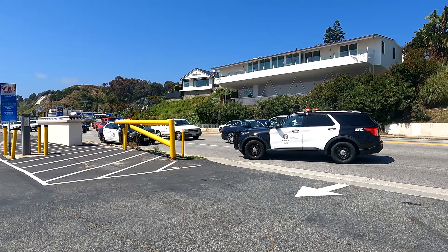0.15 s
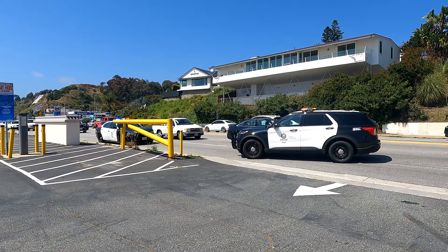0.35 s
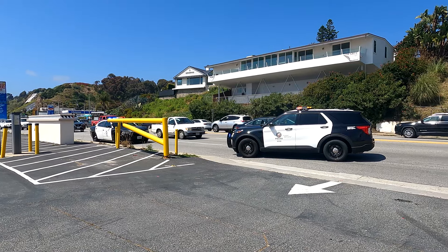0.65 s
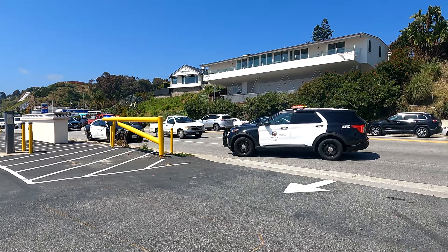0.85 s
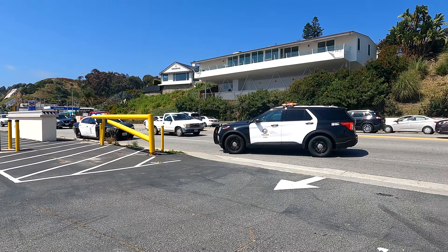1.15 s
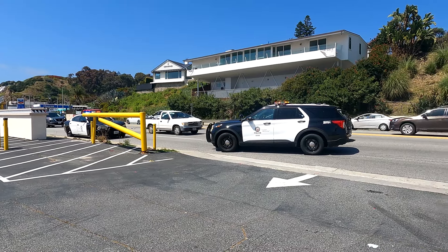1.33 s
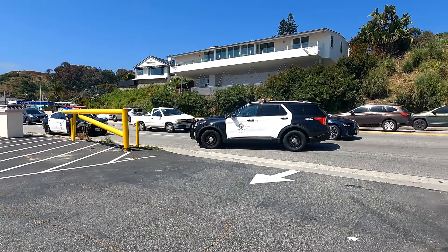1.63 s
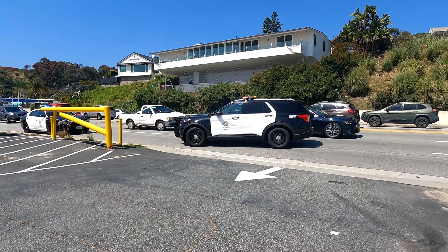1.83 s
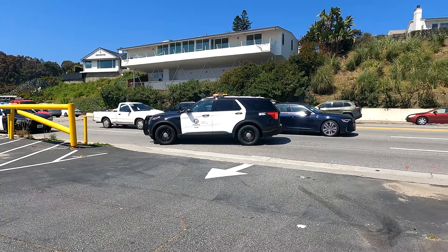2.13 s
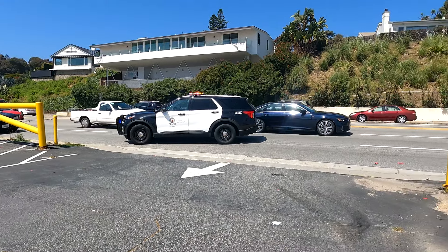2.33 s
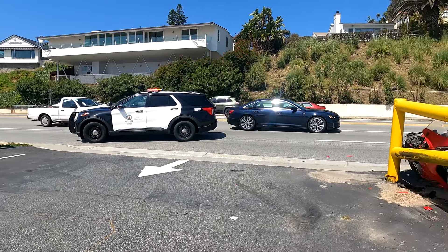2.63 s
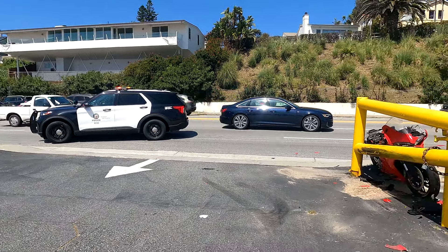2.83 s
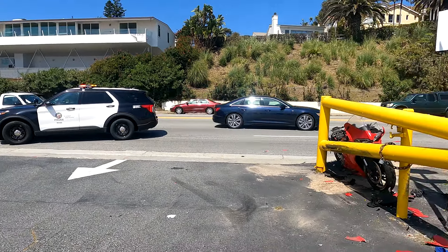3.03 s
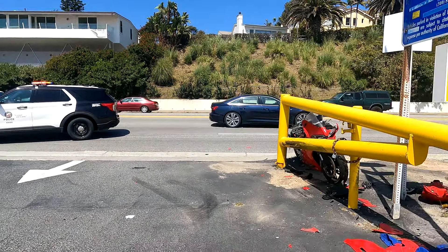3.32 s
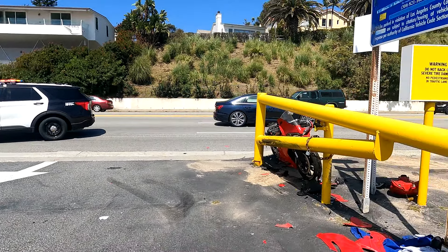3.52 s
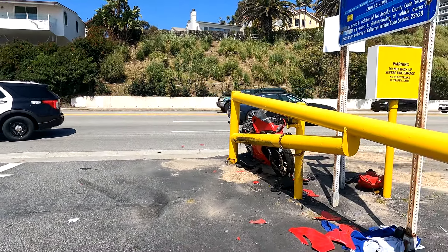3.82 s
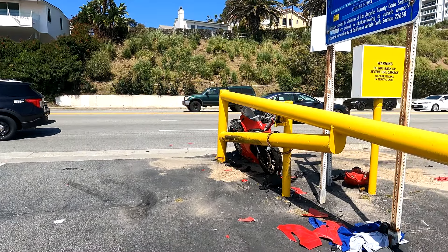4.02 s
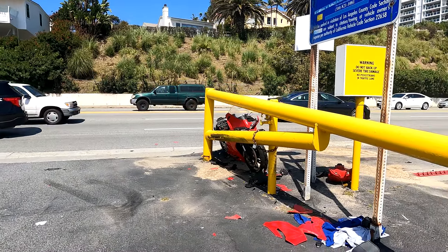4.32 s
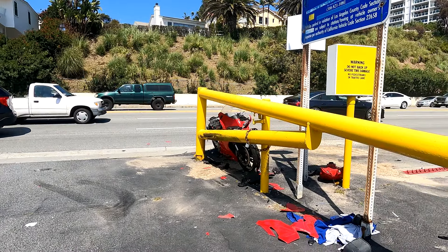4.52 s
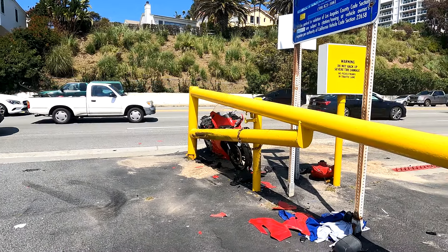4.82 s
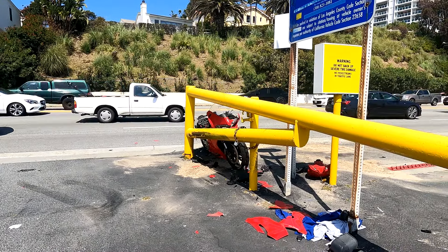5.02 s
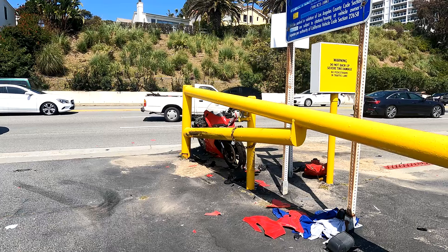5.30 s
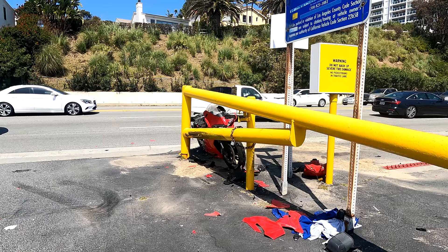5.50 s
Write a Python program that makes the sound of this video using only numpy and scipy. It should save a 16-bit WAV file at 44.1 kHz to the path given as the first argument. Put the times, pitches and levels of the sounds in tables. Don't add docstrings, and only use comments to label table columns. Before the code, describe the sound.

Outdoors beside a busy road, a small handheld microphone picks up constant traffic rumble and tyre hiss. A loud, low engine pulls away, its pitch rising slowly throughout. Past the middle, a truck engine revs up and nears, bringing clatter, tyre roar and a thin high metal squeal, then its pitch drops as it shifts and loose links clink.

```python
import sys
import numpy as np
from scipy import signal
from scipy.io import wavfile
from scipy.ndimage import uniform_filter1d

SR = 44100
rng = np.random.default_rng(int(sys.argv[2]) if len(sys.argv) > 2 else 0)


def master(y):
    cut = np.clip(np.atleast_2d(y).T, -1, 1)
    pcm = np.round(cut * 32767)
    wavfile.write(sys.argv[1], SR, pcm.astype(np.int16))


def decibels_to_gain(level_db):
    exponent = np.asarray(level_db, float) / 20
    return 10 ** exponent


N = 249503

# time_s, firing_hz, level_db
PULLER_REVS = [(0, 65.7, 2), (.2, 69.64, 0.5), (.6, 72.1, 0), (1.0, 74.38, -1.5), (1.4, 75.76, -2),
               (1.8, 78.3, -2.5), (2.4, 80.5, -3), (3.0, 83.28, -7), (3.6, 86.54, -3.5), (4.2, 89.13, -5),
               (4.8, 91.83, -4.5), (5.66, 97, -7.5)]
# order, level_db
PULLER_ORDERS = [(1, -19), (2, -24.5), (3, -29), (4, -30), (5, -33.5), (6, -39.5), (7, -45), (8, -49),
                 (9, -52), (10, -51.5)]
# centre_hz, half_width_hz, lift_db
EXHAUST_PEAKS = [(72.8, 1.9, 2), (148.9, 5.95, 8.5), (175.2, 14.8, -10), (207.7, 6.8, 8.5),
                 (234.3, 11.6, -14.5), (270, 10, 3), (290, 5.65, 10), (298, 10, -0.5), (366.4, 12, -4),
                 (406, 13.16, 9), (459, 11, -6)]
# centre_hz, half_width_hz, lift_db
INTAKE_PEAKS = [(402, 15, -4), (426, 4.7, 5.5), (440, 7.1, -7.5), (466, 14, 5), (518, 7.7, -4),
                (572.7, 27, 9)]
# freq_hz, density_db_per_hz
RUMBLE_COLOUR = [(8.8, -43.5), (15, -11.5), (59, 1), (80, 0), (118, -4.5), (155, -5.5), (254, -12.5),
                 (312, -16.5), (400, -23.5), (520, -45.5), (880, -120)]
# freq_hz, density_db_per_hz
ROAR_COLOUR = [(88, -29), (150, 1.5), (254, -10), (317, -6.5), (377, -13.5), (425, -9.5), (708, -20),
               (900, -19), (1170, -33), (1980, -120)]
# freq_hz, density_db_per_hz
HISS_COLOUR = [(600, -5.5), (800, -8), (1050, -4.5), (1500, -12), (2000, -18.5), (3000, -22.5), (4500, -29),
               (5700, -34), (6800, -43.5), (8500, -48.5), (10000, -56), (11500, -63.5), (12700, -70.5),
               (12900, -110)]
# closest_s, half_length_s, engine_lift_db, tyre_lift_db
CARS = [
    (0, 0.16, 0.5, 2),
    (0.593, 0.37, 2, 0),
    (2.096, 0.25, 3.5, 0),
    (2.502, 0.54, 1, 2.5),
    (3.098, .25, 2, 0.5),
    (3.902, .35, 3, 0.5),
]
# centre_s, half_length_s, roar_lift_db
LANE_BUNCHES = [
    (0.504, .3, 0.5),
    (2.847, 0.81, -1.5),
    (3.804, 0.2, 4),
    (4.2, 0.22, -3),
    (4.948, .35, 6),
]
# centre_s, level_db, length_s
CRUNCHES = [(.3, -90, .04), (1.04, -85, .012), (2.345, -73, .015), (2.39, -82, .04), (2.47, -79, .02),
            (2.515, -75, .035), (2.59, -80, .02), (4.87, -62, .012), (5.22, -72, .03)]
# time_s, clatter_db
TRUCK_NEARNESS = [(3.2, -47), (4.05, -48.5), (4.3, -44), (4.7, -35.5), (4.9, -35), (5.1, -32.5),
                  (5.18, -35), (5.3, -37), (5.66, -40.5)]
# freq_hz, density_db_per_hz
CLATTER_COLOUR = [(1500, -1.5), (2000, -8), (2800, -11), (3300, -10), (4000, -14), (4600, -15), (5700, -18),
                  (7000, -27.5), (8200, -31), (9500, -32), (10200, -39), (11500, -43), (14500, -45),
                  (15600, -49.5)]
# freq_hz, density_db_per_hz
TRUCK_TYRE_COLOUR = [(350, -17), (450, -5.5), (560, 3), (700, 1.5), (830, -11), (1050, 1.5), (1400, -0.5),
                     (1800, -15), (2500, -13), (3000, -34.5)]
# time_s, cancelled_hz
GROUND_NOTCH = [(3.3, 720), (4.4, 853), (5.66, 840)]
# time_s, firing_hz, level_db
DRONE_REVS = [(3.2, 145.2, -28.5), (3.5, 145.3, -24.5), (4.0, 145.1, -27), (4.27, 141.3, -33),
              (5.0, 140, -43.5), (5.3, 142, -26), (5.66, 140.5, -37)]
# time_s, firing_hz, level_db
TRUCK_REVS = [(3.3, 50.7, -12), (3.7, 62.46, -10.5), (3.88, 68.6, -1), (4.08, 80.34, 2.5), (4.4, 91.9, -2),
              (4.75, 111.1, -1.5), (4.95, 118.7, 1.5), (5.12, 121.1, -0.5), (5.66, 100.4, -4)]
# order, level_db
TRUCK_LOW_ORDERS = [(1, -20), (2, -29.5), (3, -37)]
# order, over_order_3_db
TRUCK_HIGH_ORDERS = [(2.5, 4.5), (4, -4.5), (4.5, -2.5), (5, -2.5), (8.5, -9), (9, -6), (11.5, -13)]
# centre_hz, width_hz, start_s, end_s, level_db
METAL_PARTS = [(3055, 45, 4.75, 5.12, -45), (3125, 45, 4.52, 4.97, -44), (3130, 60, 3.7, 4.5, -61),
               (3100, 90, 5.0, 5.4, -51), (3315, 26, 4.62, 4.82, -45.5), (3290, 80, 4.82, 5.12, -45),
               (3470, 70, 4.8, 5.12, -44), (3505, 21, 4.84, 4.98, -39.5), (3972, 15, 4.63, 4.9, -42),
               (4020, 60, 4.7, 5.1, -51), (4168, 15.5, 4.87, 5.0, -45), (5165, 45, 4.54, 4.95, -51),
               (5410, 45, 4.72, 5.12, -55), (8800, 1100, 4.2, 5.1, -61)]
# time_s, level_db
CHAIN_KNOCKS = [(5.21, -46), (5.235, -46), (5.285, -45), (5.315, -47), (5.415, -46), (5.535, -48)]
# mode_hz, level_db, t60_s
LINK_MODES = [(3150, 2, .1), (4590, 0, .12), (4850, -2, .1), (5165, 0, .11), (5750, -4, .08),
              (6560, -7, .07)]


def bump(x, centre, width):
    return np.exp(-.5 * ((x - centre) / width) ** 2)


def evened(x):
    return x / np.sqrt(np.mean(x ** 2) + 1e-20)


def curves(rows):
    time_s, *columns = np.transpose(rows)
    return [np.interp(np.arange(N) / SR, time_s, c) for c in columns]


def fade_in(start_s, length_s):
    return np.clip((np.arange(N) / SR - start_s) / length_s, 0, 1)


def wander(top_hz):
    f = np.geomspace(top_hz / 20, top_hz, num=16)
    t = np.arange(0, N + 256, 256) / SR
    waves = np.sin(2 * np.pi * (f * t[:, None] + rng.random(len(f))))
    slow = (waves / np.sqrt(f)).sum(axis=1)
    return np.interp(np.arange(N) / SR, t, evened(slow))


def noise(colour, patchy_db, size=1024):
    hop, hz = size // 4, np.fft.rfftfreq(size, 1 / SR)
    a, b, patches = rng.standard_normal((N // hop + 5, len(hz), 3)).T
    patches = uniform_filter1d(patches, size=10, axis=0)
    patches = evened(uniform_filter1d(patches, size=12, axis=1))
    f, db = np.transpose(colour)
    colour_db = np.interp(np.log(hz + 1), np.log(f + 1), db, left=-120, right=-120)
    spectra = (a + 1j * b) * decibels_to_gain(colour_db[:, None] + patchy_db * patches)
    return evened(signal.istft(spectra, nperseg=size, noverlap=size - hop)[1][:N])


def brightened(x, lift_db, edge_hz):
    high = signal.butter(3, edge_hz, "high", fs=SR, output="sos")
    return x + signal.sosfiltfilt(high, x) * (decibels_to_gain(lift_db) - 1)


def resonate(x, centre_hz, width_hz):
    turn = np.exp(2j * np.pi * np.cumsum(centre_hz * np.ones(N)) / SR)
    r = np.exp(-np.pi * width_hz / SR)
    smooth = signal.lfilter([1 - r], [1, -r], x * turn.conj())
    return 2 * (turn * smooth).real


def orders(firing_hz, levels, flutter_db, flutter_hz, slip_rad, lag_turns):
    turns = np.cumsum(firing_hz) / SR - lag_turns
    out = np.zeros(N)
    for order, db in levels:
        phase = 2 * np.pi * order * turns + np.pi / 3 + slip_rad * wander(flutter_hz)
        level = np.sqrt(2) * decibels_to_gain(db + flutter_db * wander(flutter_hz))
        out += level * np.cos(phase)
    return out


def puller():
    firing_hz, loud_db = curves(PULLER_REVS)
    screen_db = -4 * np.maximum(np.arange(N) / SR - 4.7, 0)
    levels = []
    for order, db in PULLER_ORDERS:
        peaks = EXHAUST_PEAKS if order < 6 else INTAKE_PEAKS
        peak_db = sum(lift * bump(order * firing_hz, f, w) for f, w, lift in peaks)
        levels.append((order, db + loud_db + screen_db * (order > 1) + peak_db))
    return orders(firing_hz, levels, flutter_db=.7, flutter_hz=6, slip_rad=.12, lag_turns=.22)


def road():
    rumble_db, roar_db, hiss_db = -24.5, -28, -38.5
    t = np.arange(N) / SR
    engines_db = sum(db * bump(t, s, w) for s, w, db, _ in CARS)
    tyres_db = sum(db * bump(t, s, w) for s, w, _, db in CARS)
    lane_db = sum(db * bump(t, s, w) for s, w, db in LANE_BUNCHES)
    rumble = decibels_to_gain(rumble_db + engines_db) * noise(RUMBLE_COLOUR, patchy_db=1.4, size=4096)
    roar = decibels_to_gain(roar_db + lane_db) * noise(ROAR_COLOUR, patchy_db=2.0, size=2048)
    gust_db = 3.5 * bump(t, .3, .15)
    hiss = brightened(noise(HISS_COLOUR, patchy_db=0.6), 2.5 - tyres_db + gust_db, edge_hz=6500)
    return rumble + roar + decibels_to_gain(hiss_db + tyres_db) * hiss


def grit():
    t = np.arange(N) / SR
    push = sum(decibels_to_gain(db) * bump(t, s, .5 * length_s) for s, db, length_s in CRUNCHES)
    clicks_per_s = 4000
    sizes = decibels_to_gain(4 * np.minimum(rng.exponential(size=N), 4))
    clicks = rng.standard_normal(N) * sizes * (rng.random(N) < clicks_per_s / SR)
    band = signal.butter(2, [10500, 16000], "band", fs=SR, output="sos")
    return push * evened(signal.sosfilt(band, clicks))


def truck_clatter():
    t = np.arange(N) / SR
    near_db, = curves(TRUCK_NEARNESS)
    load_db = -2 - 9 * fade_in(4.79, .35)
    clatter = brightened(noise(CLATTER_COLOUR, patchy_db=1.5, size=512), load_db, edge_hz=5640)
    finest_db = .5 * (near_db + 38.5) - 20 * (1 - fade_in(3.7, .6))
    clatter = brightened(clatter, finest_db, edge_hz=17000)
    tyre_lead_s, tyre_over_clatter_db = .03, 5
    tyre_db = np.interp(t + tyre_lead_s, t, near_db) + tyre_over_clatter_db
    tyres = decibels_to_gain(tyre_db) * noise(TRUCK_TYRE_COLOUR, patchy_db=0.6)
    return fade_in(2.84, 1.0) * decibels_to_gain(0.53 * wander(60)) * (decibels_to_gain(near_db + 2.5) * clatter + tyres)


def drone():
    firing_hz, db = curves(DRONE_REVS)
    tone = orders(firing_hz, [(0.97, db)], flutter_db=1.5, flutter_hz=9.8, slip_rad=0.6, lag_turns=0)
    return fade_in(3.05, 0.086) * tone


def truck_engine():
    firing_hz, loud_db = curves(TRUCK_REVS)
    clutch_db = -10 * bump(np.arange(N) / SR, 5.25, 0.065)
    far_db = -20 * (1 - fade_in(4.3, 0.25))
    levels = []
    for order, db in TRUCK_LOW_ORDERS:
        boom_db = 6 * bump(order * firing_hz, 221, 25)
        levels.append((order, db + loud_db + clutch_db * (order > 1) + boom_db))
    third_db = levels[-1][1]
    levels += [(order, third_db + db + far_db) for order, db in TRUCK_HIGH_ORDERS]
    engine = orders(firing_hz, levels, flutter_db=.9, flutter_hz=7, slip_rad=.15, lag_turns=.92)
    return fade_in(3.1, .4) * engine


def truck_metal():
    pure_width_hz, swell_s_per_khz = 14.5, .4
    shake = rng.standard_normal(N) * decibels_to_gain(1.5 * wander(30))
    t, out = np.arange(N) / SR, np.zeros(N)
    for hz, width_hz, start_s, end_s, db in METAL_PARTS:
        pure = min(pure_width_hz / width_hz, 1) ** 2
        rise = fade_in(start_s - .03, 0.017 + swell_s_per_khz * width_hz / 1000)
        singing = rise * (1 - fade_in(end_s - .02, 0.056))
        fuzz = evened(resonate(resonate(shake, hz, width_hz), hz, width_hz))
        level = np.sqrt(2) * decibels_to_gain(1.5 + .8 * wander(12))
        tone = level * np.cos(2 * np.pi * hz * t + .45 * wander(14))
        out += decibels_to_gain(db) * singing * (np.sqrt(pure) * tone + np.sqrt(1 - pure) * fuzz)
    return out


def chain():
    out = np.zeros(N)
    luck = rng.standard_normal((len(CHAIN_KNOCKS), len(LINK_MODES), 2))
    for (start_s, db), knock_luck in zip(CHAIN_KNOCKS, luck):
        first = round(start_s * SR)
        age_s = np.arange(N - first) / SR
        attack = np.minimum(age_s / .003, 1)
        for (hz, mode_db, t60_s), (level_luck, pitch_luck) in zip(LINK_MODES, knock_luck):
            decay = decibels_to_gain(db + 3 + mode_db + 3 * level_luck - 60 * age_s / t60_s)
            ring = np.sin(2 * np.pi * hz * (1 + .004 * pitch_luck) * age_s)
            out[first:] += attack * decay * ring
    return out


def scene():
    tyres = road() + truck_clatter()
    notch_hz, = curves(GROUND_NOTCH)
    tyres -= 0.44 * fade_in(3.18, 0.49) * resonate(tyres, notch_hz, 240)
    truck = truck_engine() + truck_metal() + chain()
    return (puller() + truck + drone() + tyres + grit())[None]


def band_limit(x):
    return signal.sosfilt(signal.butter(12, 15700, fs=SR, output="sos"), x)


def record(dry):
    ceiling, stop_s = 1.3, .004
    dry = dry * (1 - .7 * fade_in(N / SR - stop_s, stop_s))
    return band_limit(ceiling * np.tanh(dry / ceiling))


dry = scene()
out = record(dry)
master(out)
```